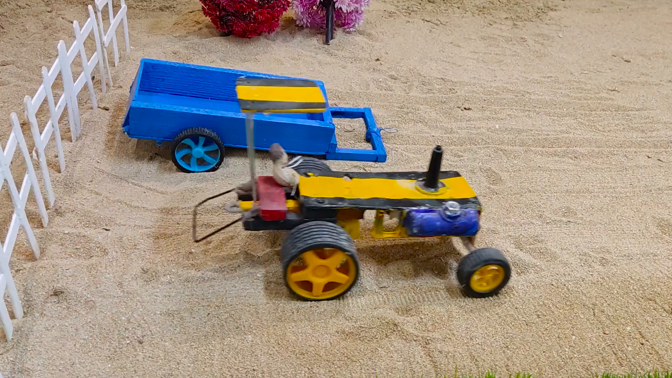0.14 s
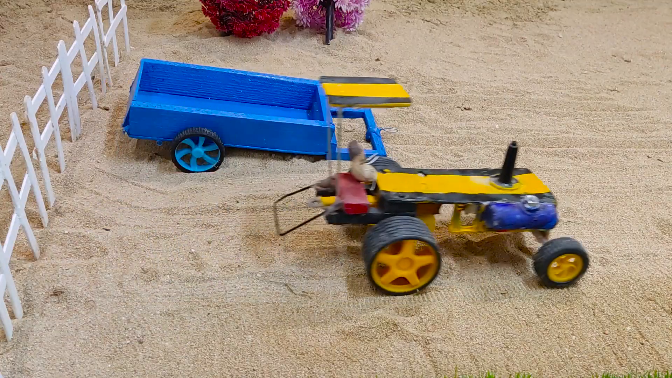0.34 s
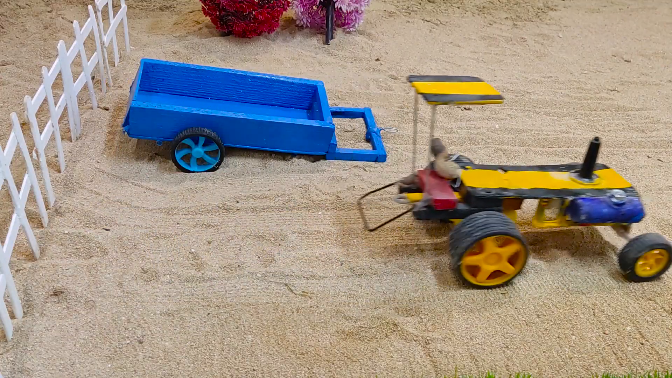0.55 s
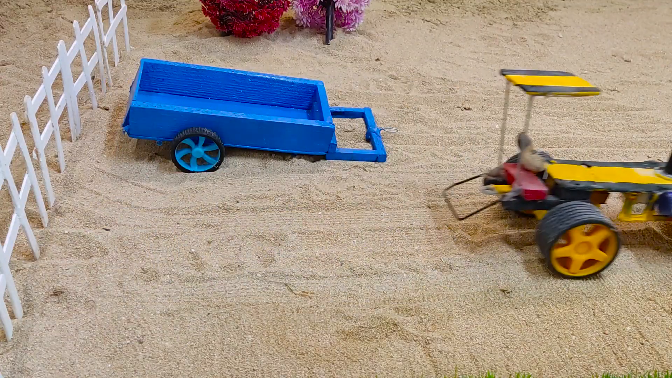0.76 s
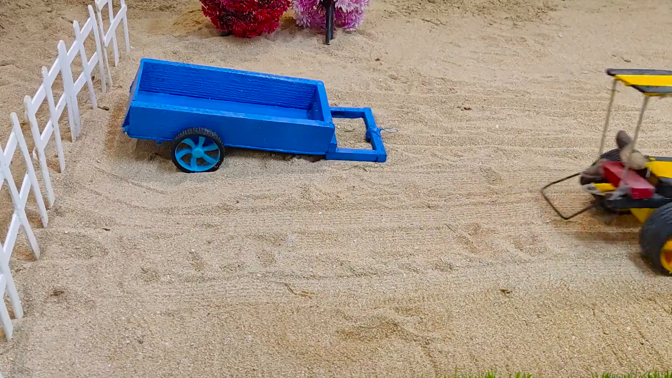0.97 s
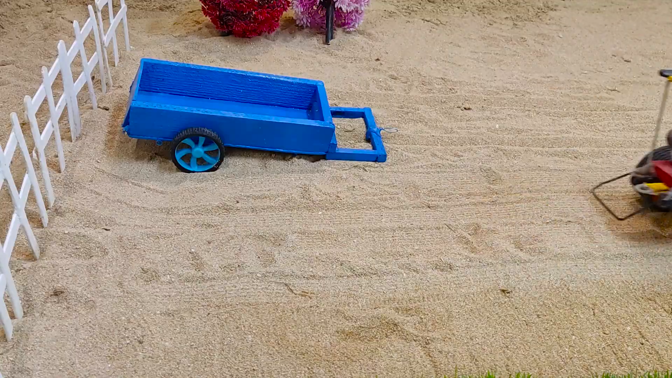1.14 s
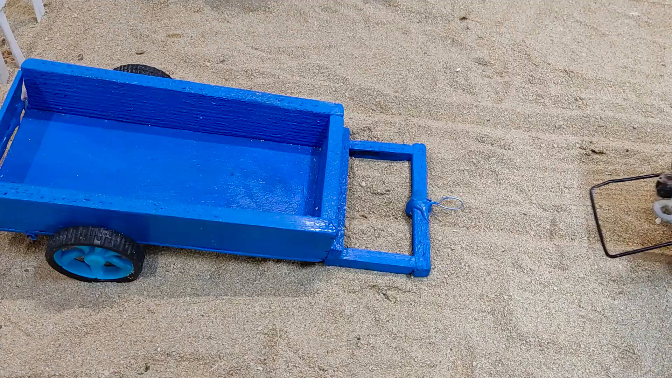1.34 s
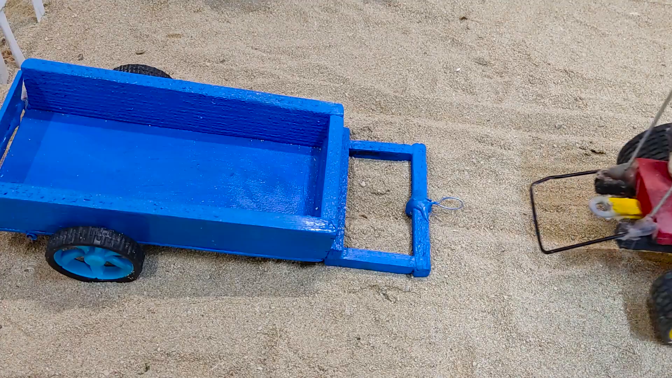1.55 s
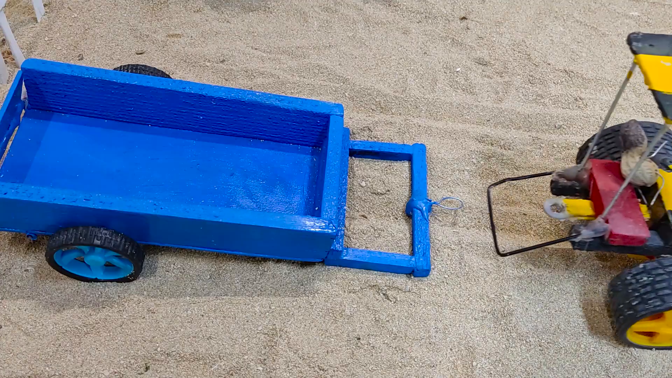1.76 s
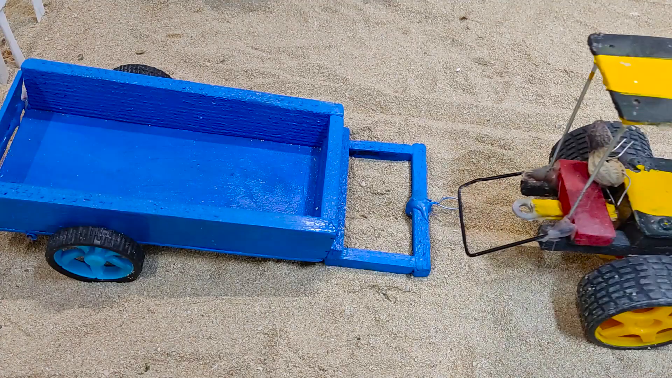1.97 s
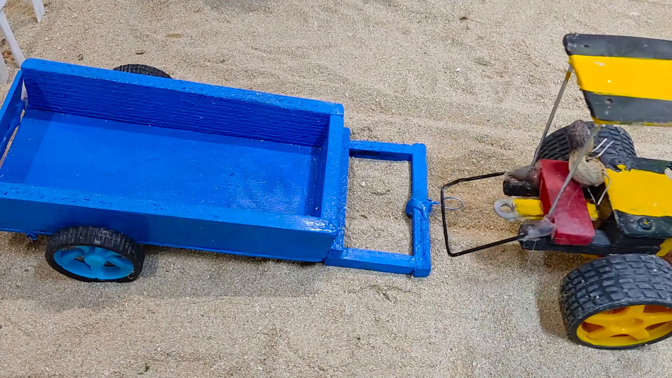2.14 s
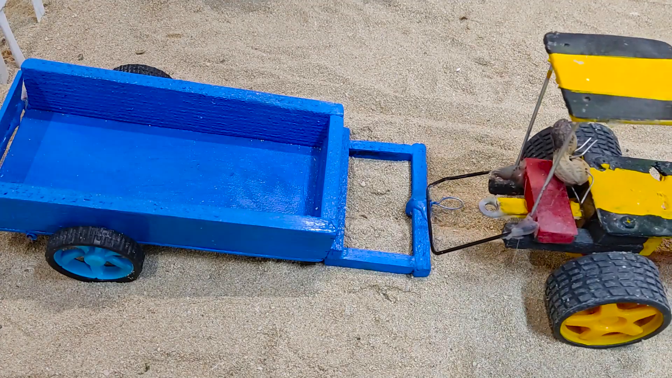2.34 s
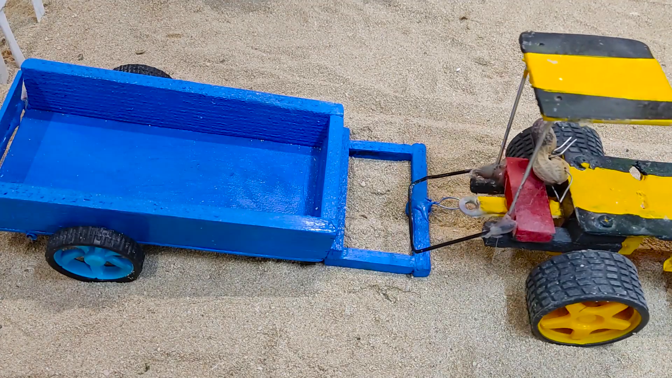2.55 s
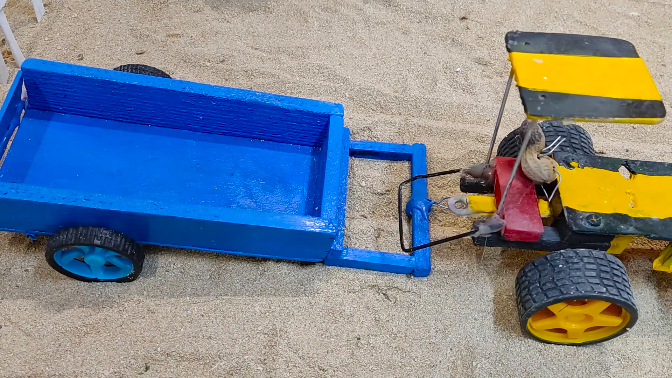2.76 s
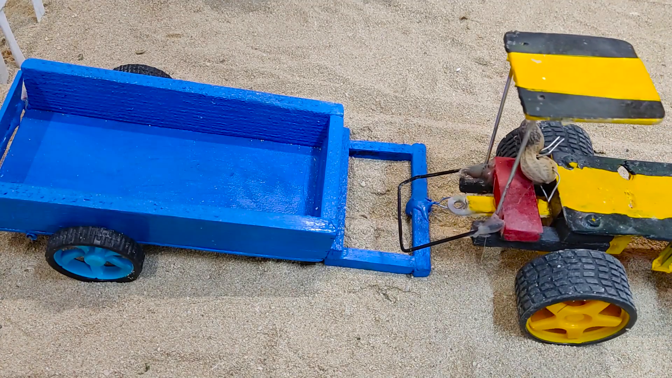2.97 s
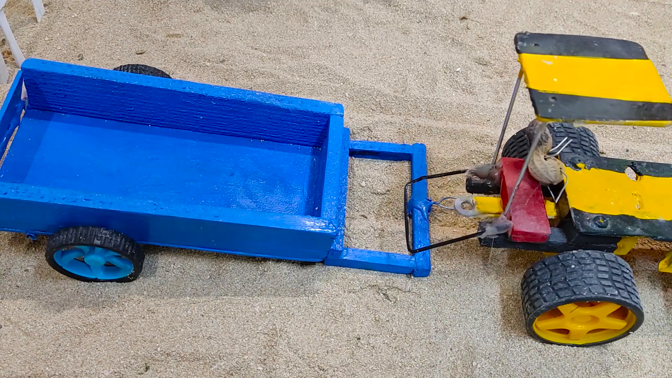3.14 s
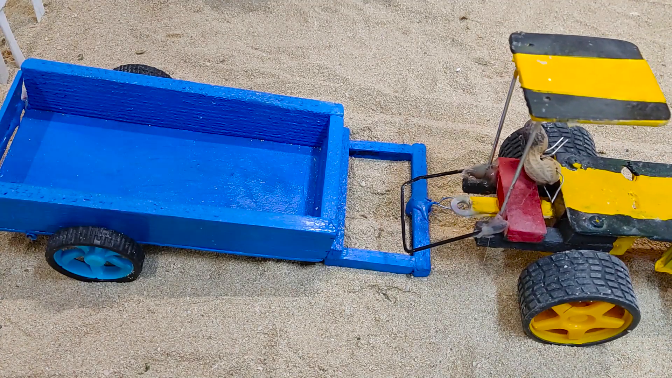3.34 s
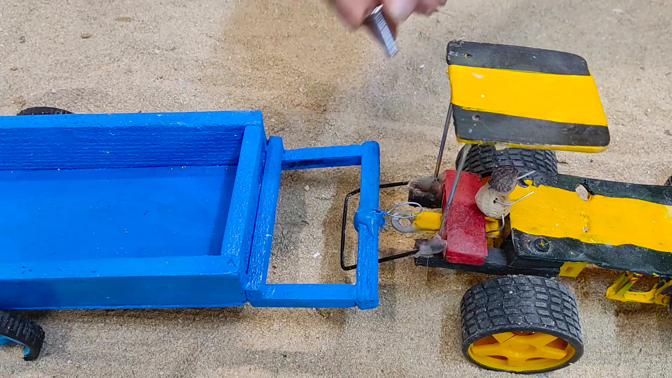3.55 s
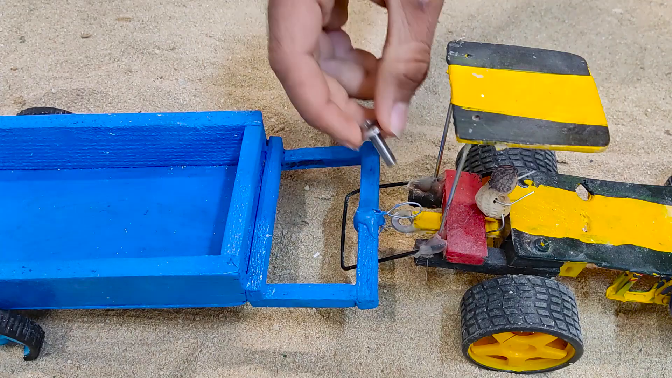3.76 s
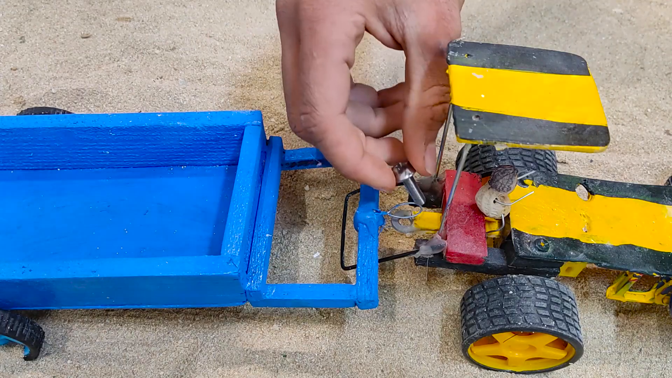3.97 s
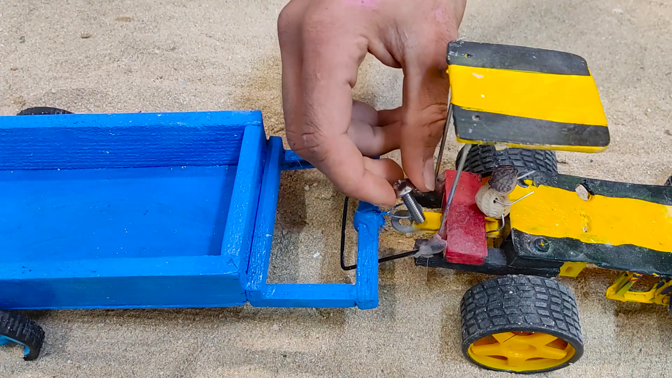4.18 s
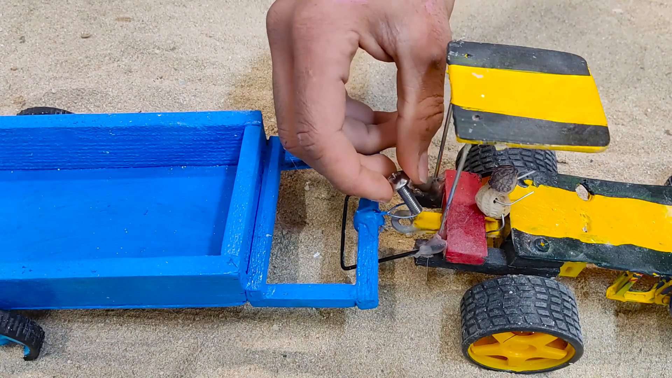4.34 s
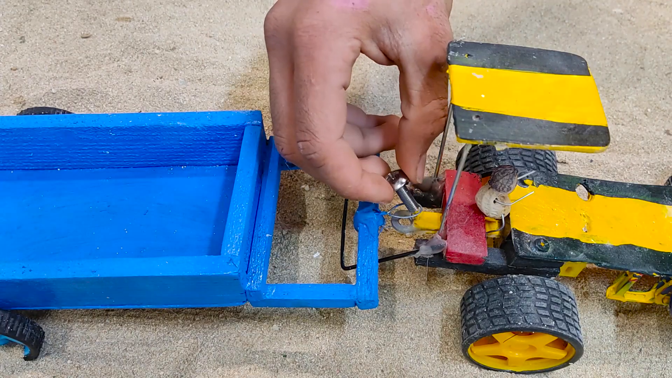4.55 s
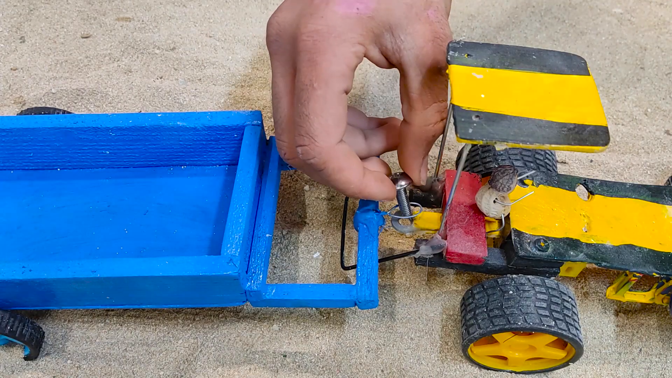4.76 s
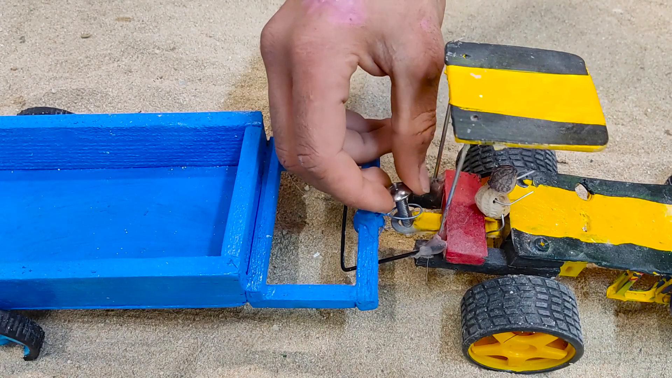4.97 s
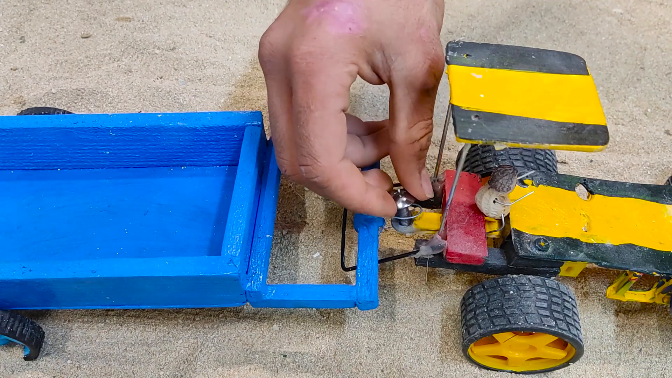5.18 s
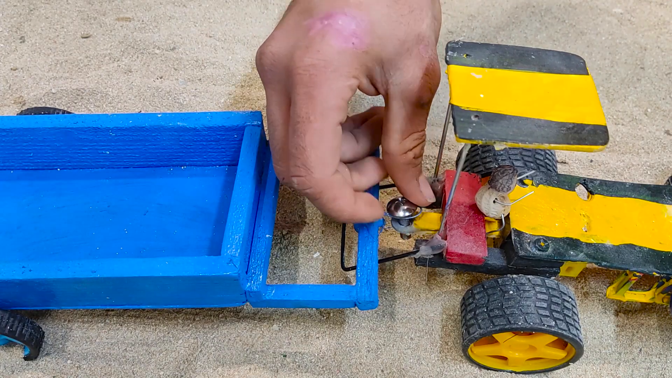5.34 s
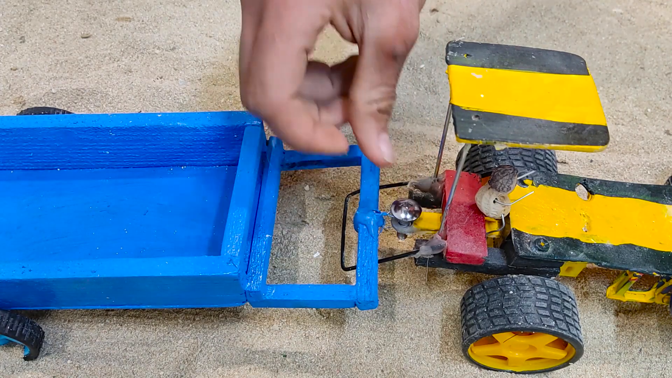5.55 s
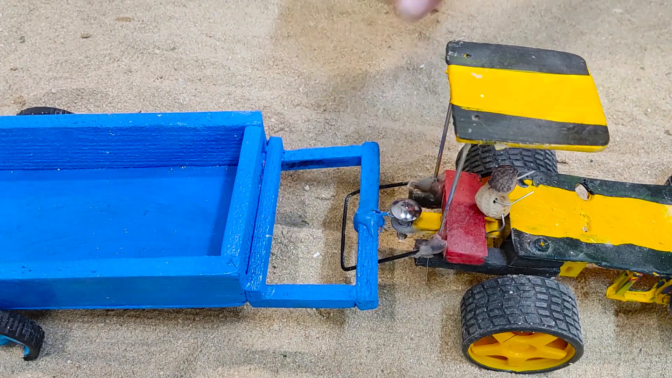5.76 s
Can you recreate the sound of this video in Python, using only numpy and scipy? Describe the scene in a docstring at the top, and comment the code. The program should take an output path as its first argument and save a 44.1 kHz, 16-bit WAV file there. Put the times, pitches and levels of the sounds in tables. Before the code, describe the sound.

Outdoor toy tractor scene in three abrupt cuts: first a centred, distant four-cylinder diesel running evenly, then a harder three-cylinder clatter close to the microphone with thin whine and wide rattle, then no engine nearby. Night crickets pulse over a far low rumble and thin hum, a clear trilling insect sits to the left, and a small metal part clicks sharply, knocks again louder and settles with soft thuds.

```python
"""Two diesels and a dropped pin

Three scenes with short silences between them: a four-cylinder diesel idles at a distance, a three-cylinder
one clatters close by, then a night field of crickets over a far rumble, where a steel pin drops into a
plastic hitch. Engines are noisy blows through resonances plus exhaust tones; crickets are falling tones,
far insects and rumble are filtered noise, and the pin is a crack with decaying tones."""
import sys
import numpy as np
from scipy import signal
from scipy.fft import rfft, irfft, next_fast_len
from scipy.io import wavfile
from scipy.ndimage import uniform_filter1d

SR = 44100
rng = np.random.default_rng(int(sys.argv[2]) if len(sys.argv) > 2 else 0)


def dump(signal):
    """Clip the signal to [-1, 1] and save it as 16-bit WAV at the path in sys.argv[1]."""
    limited = np.clip(np.atleast_2d(signal).T, -1, 1)
    pcm = np.round(limited * 32767).astype(np.int16)
    wavfile.write(sys.argv[1], SR, pcm)


N = 256220
TIME = np.arange(N) / SR  # seconds

# When each scene plays: start in seconds, end in seconds.
FAR_SPAN, NEAR_SPAN, NIGHT_SPAN = (-.1, 1.236), (1.258, 3.445), (3.471, 6.0)


def undb(db):
    """Turn decibels into a plain multiplier."""
    return 10 ** (np.asarray(db) / 20)


def level(x, db, span=None):
    """Set the rms level, measured over a span of time or over everything."""
    part = x[..., max(int(span[0] * SR), 0):int(span[1] * SR)] if span else x
    return x * undb(db) / np.sqrt(np.mean(part ** 2))


def noise():
    """White noise, equally strong at every pitch."""
    return rng.standard_normal(N)


def sine(hz, t, phase=0):
    """A pure tone."""
    return np.sin(2 * np.pi * hz * t + phase)


def bump(since_s, ms):
    """A smooth bell-shaped swell around time zero."""
    return np.exp(-.5 * (1000 * since_s / ms) ** 2)


def band(x, hz, width_hz):
    """A resonance with gain 1 at its centre."""
    return signal.lfilter(*signal.iirpeak(hz, hz / width_hz, fs=SR), x)


def steep(x, design):
    """Run a steep filter given as second-order sections."""
    return signal.sosfilt(design, x)


def bandpass(x, order, edges_hz):
    """Keep only what lies between two pitches."""
    return steep(x, signal.butter(order, edges_hz, "bandpass", fs=SR, output="sos"))


def decay(x, ms):
    """Every pulse becomes an exponential tail."""
    return signal.lfilter([1], [1, -np.exp(-1000 / (ms * SR + 500))], x)


def colour(x, points):
    """Shape a spectrum by points of Hz and dB."""
    hz, db = np.transpose(points)
    size = next_fast_len(N)
    log_hz = np.log(np.fft.rfftfreq(size, 1 / SR) + 1)
    return irfft(rfft(x, size) * undb(np.interp(log_hz, np.log(hz), db)), size)[:N]


def curve(table):
    """Draw straight lines between the rows of a table, one curve per column after the time."""
    s, *columns = np.transpose(table)
    return [np.interp(TIME, s, column) for column in columns]


def gate(start, end, fade=0.0011):
    """Open from start to end, with straight fades inside both ends; all in seconds."""
    return np.clip(np.minimum(TIME - start, end - TIME) / fade, 0, 1)


def walk(rate):
    """Slow random wander with spread 1, heading for a new value rate times a second."""
    hold = int(SR / rate)
    steps = np.repeat(rng.standard_normal(N // hold + 1), hold)
    x = uniform_filter1d(steps, hold)[:N]
    return x / x.std()


def left_right(song, pan_db, late_ms):
    """Place a sound by a level difference, left minus right, and by how late it reaches the left."""
    left = np.roll(song, int(late_ms * SR / 1000))
    return np.array([left * undb(pan_db / 2), song * undb(-pan_db / 2)])


def rattle(habit, round_s):
    """Noise of loose parts, whose lower part comes back nearly the same in each round of all cylinders."""
    share, memory, top_hz = habit
    fresh = np.sqrt(1 - memory ** 2)
    rounds = rng.standard_normal((int(N / SR / round_s) + 1, int(round(round_s * SR))))
    rounds[0] /= fresh  # so the first round is as strong as the rest
    same = signal.lfilter([fresh], [1, -memory], rounds, axis=0).ravel()
    same = np.sqrt(share) * np.resize(same, N) + np.sqrt(1 - share) * noise()
    size = next_fast_len(N)
    low = 1 / (1 + (np.fft.rfftfreq(size, 1 / SR) / top_hz) ** 12)
    mixed = rfft(same, size) * np.sqrt(low) + rfft(noise(), size) * np.sqrt(1 - low)
    return irfft(mixed, size)[:N]


def patchy(x, flicker_db):
    """Each narrow treble band swells and fades on its own, so the hiss turns gritty."""
    centres_hz = 3700 * 1.09 ** np.arange(14)
    return x + sum((undb(flicker_db * walk(40)) - 1) * band(x, hz, hz / 14) for hz in centres_hz)


def body(x, peaks):
    """Side-by-side resonances of the engine, added with alternating sign."""
    return sum((-1) ** k * undb(db) * band(x, hz, width) for k, (hz, width, db) in enumerate(peaks))


def exhaust_thump(tones, cycle, silencer):
    """Tones at multiples of the firing rate, each wandering in level; the silencer turns their phase."""
    return sum(undb(db + walk(9)) * np.cos(2 * np.pi * k * cycle - 2 * np.arctan(2.5 * (k - silencer)))
               for k, db in tones)


def panel_booms(booms, t, round_s):
    """Panels ring briefly once in each round of all cylinders: bell-shaped bursts of tone."""
    out = 0
    for at_ms, hz, db, ms in booms:
        since = (t - at_ms / 1000 + round_s / 2) % round_s - round_s / 2
        out = out + undb(db + 1.04 * walk(6.97)) * bump(since, ms) * sine(hz, since)
    return out


def diesel(span, firing, cylinders, blow, block, knock, hiss, exhaust, pipe, booms, mix, habit):
    """Firings in cylinder order: a blow and its rebound ring block and chamber, the exhaust thumps later."""
    first_s, rate = firing
    rise_ms, decay_ms, rebound_ms, tail_ms, tail_db, scatter_db, strike_db = blow
    *layer_dbs, hiss_tilt, flicker_db = mix
    thump_late_ms, silencer = pipe
    count = int((span[1] - first_s) * rate) + 1
    round_s = len(cylinders) / rate
    rows = np.array(cylinders)[np.arange(count) % len(cylinders)]
    chance = rng.standard_normal((count, 6))
    late_s = (rows[:, 0] + 0.026 * chance[:, 0]) / 1000
    at = ((first_s + np.arange(count) / rate + late_s) * SR).astype(int)

    def blows(column, strike):
        """A clean strike, then loose parts rattle."""
        hits = np.zeros(N)
        size = undb(rows[:, column] + scatter_db * chance[:, column])
        hits[at] = size
        tail = undb(tail_db) * decay(hits, tail_ms)  # only the first blow has this long tail
        rebound = undb(rows[:, 4] + scatter_db * chance[:, 4])
        hits[at + int(rebound_ms * SR / 1000)] = size * rebound
        swell = decay(decay(hits, decay_ms) + tail, rise_ms)
        return strike * hits + level(swell, -14.0, span) * rattle(habit, round_s)

    t = TIME - first_s
    cycle = (t - thump_late_ms / 1000) * rate
    cylinder_db = np.interp(cycle, np.arange(count), rows[:, 5])
    puff = [(hz, db - hiss_tilt * np.log2(max(hz / 5000, 1))) for hz, db in hiss]
    layers = (
        body(blows(column=1, strike=undb(strike_db)), block),
        body(blows(column=2, strike=undb(strike_db)), knock),
        colour(blows(column=3, strike=0), puff),
        colour(rattle(habit, round_s) * undb(1.38 * walk(160)), hiss),
        exhaust_thump(exhaust, cycle, silencer) * undb(cylinder_db))
    engine = sum(level(x, db, span) for x, db in zip(layers, layer_dbs))
    return patchy(engine, flicker_db) + panel_booms(booms, t, round_s)


# First firing in seconds, firings per second.
FAR_FIRING = (.001, 24.435)
# The cylinders in firing order. Each row: lateness in ms, then block, knock, hiss, rebound and exhaust in dB.
FAR_CYLINDERS = [(-0.9, -1, 1, -1.5, -5, -2), (-3, -1.5, -3.5, -2, -11, -4.5),
                 (-2.5, -6.5, -5, -6, 3.5, -2), (-3, -8, -3.5, -7, 2, -1)]
# One blow: rise in ms, decay in ms, rebound after ms, tail in ms, tail in dB, scatter in dB, strike in dB.
FAR_BLOW = (1.5, 9.5, 5, 18, -6, 0.6, 0.5)
# Rattle: share that repeats (0-1), memory from round to round (0-1), repeats up to this many Hz.
FAR_HABIT = (.75, .7, 2600)
# Resonances of the engine block. Each row: pitch in Hz, width in Hz, gain in dB.
FAR_BLOCK = [(317, 15.2, -7.5), (349.5, 14, -7.5), (477.6, 6.4, -3), (673, 9.3, -8), (880, 52, -11),
             (974, 29.5, -4.5), (1097, 85, -8.5), (1140, 43, -6.5), (1310, 54, -32), (1411.6, 35.7, -2),
             (1420, 90, -16)]
# Resonances of the combustion knock. Each row: pitch in Hz, width in Hz, gain in dB.
FAR_KNOCK = [(2025, 63, 1.5), (2215, 170, -2), (2400, 54, 2), (2860, 270, -17), (3480, 290, -9)]
# Tone colour of gas hiss and running noise. Each row: pitch in Hz, relative strength in dB per Hz.
FAR_HISS = [(53, -28.5), (90, -7), (117, -7.5), (219, -8), (310, -3.5), (581, -3.5), (1140, 0), (2430, -9),
            (3830, -21.5), (4450, -26), (6030, -29.5), (14700, -58.5), (16000, -63)]
# Exhaust tones. Each row: multiple of the firing rate, relative level in dB.
FAR_EXHAUST = [(2, -1.5), (3, 3), (4, -37.5), (5, -32), (6, -6), (7, -13.5), (8, -34), (10, -10.5),
               (13, -6)]
# Exhaust pipe: thump lateness in ms, silencer resonance as a multiple of the firing rate.
FAR_PIPE = (12.4, 9)
# Ringing panels. Each row: time within the round in ms, pitch in Hz, level in dB, length in ms.
FAR_BOOMS = [(6.05, 1109, -24.5, 8.3), (18.2, 1150, -30, 5), (46, 970, -31.5, 2.3), (46.07, 367, -34, 5.3),
             (54, 1094, -29, 6.7), (69.3, 372, -33, 8.5), (85.57, 887, -49, 3.5), (88.6, 385, -35, 4.2),
             (95, 1200, -28, 2.9), (101.7, 1300, -37, 5.4), (132.5, 338, -28, 5.2), (135.5, 1143, -33, 4.6),
             (139.9, 322, -29.5, 9.7)]
# Levels in dB: block, knock, pulsed hiss, steady noise, exhaust; then how much the pulsed hiss is dulled
# above 5 kHz in dB per octave (below zero brightens it), and treble flicker in dB.
FAR_MIX = (-35, -41, -31.5, -31.5, -35.5, -2, 2)


def far_diesel():
    """Four cylinders at a distance, the same on both sides; soft, slowly rising blows."""
    return diesel(FAR_SPAN, FAR_FIRING, FAR_CYLINDERS, FAR_BLOW, FAR_BLOCK, FAR_KNOCK, FAR_HISS,
                  FAR_EXHAUST, FAR_PIPE, FAR_BOOMS, FAR_MIX, FAR_HABIT)


# Thin squeaks from the far machine. Each row: centre in seconds, length in seconds, pitch in Hz,
# level in dB before the final doubling.
SQUEAKS = [(.148, .02, 14300, -72), (.195, .04, 14700, -66), (.212, .015, 8950, -62),
           (.232, .025, 14500, -71), (0.25, .03, 9000, -62), (.278, 0.031, 8900, -59),
           (.312, .02, 14600, -69), (.35, .025, 10850, -68), (.4, .04, 10800, -64), (.432, .02, 14550, -69),
           (.468, .015, 14500, -71), (.518, .03, 14650, -66), (0.683, .02, 10800, -71),
           (.728, .025, 10750, -68), (.845, 0.027, 10850, -68), (.93, .025, 10650, -73),
           (1.05, .02, 10900, -71), (1.165, .025, 14650, -69)]


def squeaks():
    """Short wavering whistles: bell-shaped bursts of tone that share one unsteady phase."""
    waver = 1.5 * walk(200)
    return 2 * sum(undb(db) * bump(TIME - s, 1000 * length / 2.5) * sine(hz, TIME, waver)
                   for s, length, hz, db in SQUEAKS)


# The near engine's settings have the same columns as the far engine's.
# First firing in seconds, firings per second.
NEAR_FIRING = (1.2602, 22.325)
# The cylinders in firing order. Each row: lateness in ms, then block, knock, hiss, rebound and exhaust in dB.
NEAR_CYLINDERS = [(0.324, -2, 3.5, 2, -17, -1.3), (0.78, -6.5, -10.5, -2.5, 2, -0.0055),
                  (-0.525, 1, 5, 2, -17, -1.6)]
# One blow: rise in ms, decay in ms, rebound after ms, tail in ms, tail in dB, scatter in dB, strike in dB.
NEAR_BLOW = (0.4, 4.5, 6, 16, -4, 1.5, 20.5)
# Rattle: share that repeats (0-1), memory from round to round (0-1), repeats up to this many Hz.
NEAR_HABIT = (.85, .99, 3500)
# Resonances of the engine block. Each row: pitch in Hz, width in Hz, gain in dB.
NEAR_BLOCK = [(293, 5.8, -15), (565, 12, -5), (623, 49, -9), (783, 18, -13), (849, 11, -8), (955, 210, -3),
              (1055, 74, 2.5), (1224, 51, 3), (1300, 126, 2), (1415, 60, 2.5), (1574, 24, 1.5)]
# Resonances of the combustion knock. Each row: pitch in Hz, width in Hz, gain in dB.
NEAR_KNOCK = [(2060, 400, -15), (2410, 197, -2), (2625, 263, -1.5), (2770, 202, 3.5), (2943, 244, 3),
              (3128, 251, -1.5)]
# Tone colour of gas hiss and running noise. Each row: pitch in Hz, relative strength in dB per Hz.
NEAR_HISS = [(18, -43.5), (30, -17), (98, -7.5), (199, -4), (355, -8), (780, -0.5), (1160, -6), (1500, -2),
             (2120, -11.5), (2900, -12), (3580, -17), (5450, -24.5), (10800, -23), (14000, -37),
             (16000, -56)]
# Exhaust tones. Each row: multiple of the firing rate, relative level in dB.
NEAR_EXHAUST = [(3, -26), (4, 1), (5, -1), (6, 0), (7, -2.5), (8, 2), (9, -5.5), (10, -0.5), (11, -20),
                (19, -8)]
# Exhaust pipe: thump lateness in ms, silencer resonance as a multiple of the firing rate.
NEAR_PIPE = (28.5, 7.35)
# Ringing panels. Each row: time within the round in ms, pitch in Hz, level in dB, length in ms.
NEAR_BOOMS = [(58.66, 189, -23.5, 11.8), (127, 577.3, -25.5, 8.1), (86.07, 267, -26, 5.4),
              (3.07, 995, -13.5, 1.7), (6.83, 787, -17, 2.8), (9.01, 1533, -16.5, 2.8),
              (7.556, 2670, -20.5, 1.55), (22.22, 840, -25.5, 4.6), (48, 830, -22, 1.33),
              (59.2, 738, -25.5, 4.9), (76, 720, -26, 2.84), (93.16, 2980, -18.5, 1.7),
              (92.5, 975, -22, 1.4), (93.6, 1390, -20.5, 2.2), (96, 780, -23.5, 4.8),
              (99.5, 2300, -22.5, 3.4), (103.5, 1270, -20.5, 2.2), (107, 624, -27, 4.3),
              (110, 2820, -23.5, 2)]
# Levels in dB: block, knock, pulsed hiss, steady noise, exhaust; then dulling of the pulsed hiss above
# 5 kHz in dB per octave (below zero brightens it), and treble flicker in dB.
NEAR_MIX = (-29.5, -26, -27, -25.5, -27, -0.8, 2.5)
# Thin whines of belts or pumps. Each row: pitch in Hz, level in dB.
NEAR_WHINES = [(12575, -57), (13609, -59)]
# Slow changes of loudness. Each row: time in seconds, overall gain, knock band gain and bass gain in dB.
NEAR_LOUDNESS = [(1.26, -0.5, -0.5, -3), (2.2, -0.4, 1.05, -1.1), (3.44, 0.5, -2, -0.3)]
# How far the sound spreads sideways. Each row: pitch in Hz, gain of the left-right difference in dB.
NEAR_WIDTH = [(60, -36.5), (130, -62), (300, -30.5), (500, -21.5), (800, -14), (1400, -19.5), (2800, -10),
              (5000, -1), (6800, 1), (9200, -18), (12000, -2), (15000, 1)]
# Share of the clatter that leans left, and how much earlier it arrives there.
NEAR_LEFT, NEAR_LEFT_EARLY_MS = .11, .02


def near_diesel():
    """Close by, rattle and hiss come from all over the machine, unlike left and right; belts or pumps whine."""
    def engine(blow, booms):
        return diesel(NEAR_SPAN, NEAR_FIRING, NEAR_CYLINDERS, blow, NEAR_BLOCK, NEAR_KNOCK, NEAR_HISS,
                      NEAR_EXHAUST, NEAR_PIPE, booms, NEAR_MIX, NEAR_HABIT)

    mid = engine(NEAR_BLOW, NEAR_BOOMS)
    spread = engine(NEAR_BLOW[:-1] + (-20,), [])  # hardly any clean strike, no panels
    mid = mid + sum(undb(db + 3 * walk(12)) * sine(hz, TIME, .5 * walk(43)) for hz, db in NEAR_WHINES)
    loud_db, knock_db, bass_db = curve(NEAR_LOUDNESS)
    knock_change = (undb(knock_db) - 1) * band(mid, 2800, 1300)
    bass_change = (undb(bass_db) - 1) * band(mid, 180, 140)
    mid = mid + knock_change + bass_change
    # adding some slope to one side and taking it from the other shifts their arrival times apart
    lean = NEAR_LEFT * mid + NEAR_LEFT_EARLY_MS * SR / 2000 * np.gradient(mid)
    side = colour(spread, NEAR_WIDTH) + band(band(lean, 2000, 5000), 2600, 7000)
    return np.array([mid + side, mid - side]) * undb(loud_db)


# Sounding part of each stroke; how far down the fall the wing resonates, and how widely.
STROKE_SHARE, WING_SHARE, WING_WIDTH_HZ = .8, 0.31, 650


def wing(rate, top_hz, fall_hz, pan_db, late_ms):
    """Each wing stroke is a tone falling in pitch, loudest near the wing's resonance; a short rest follows."""
    pace = rate * (1 + .025 * walk(6) + .07 * walk(35))
    stroke = (np.cumsum(pace) / SR + rng.random()) % 1
    stroke = np.minimum(stroke / STROKE_SHARE, 1)
    pitch_hz = top_hz - fall_hz * stroke + 60 * walk(23)
    tone = np.sin(2 * np.pi * np.cumsum(pitch_hz) / SR)
    strength = undb(2.0 * walk(11.0) + 2.9 * walk(300)) * np.sin(np.pi * stroke)
    song = band(strength * tone, top_hz - WING_SHARE * fall_hz, WING_WIDTH_HZ)
    return left_right(song, pan_db, late_ms)


# Chirps, about four a second. Each row: end in seconds, level in dB when fully swelled.
CHIRPS = [(3.612, -35), (3.848, -33.5), (4.100, -34.5), (4.358, -32.5), (4.605, -32.5), (4.848, -33),
          (5.100, -33), (5.345, -32), (5.585, -32), (5.835, -33)]
# Chirp length, the swell at its start, the slow sag after it, the quick end.
CHIRP_S, SWELL_S, SWELL_DB, SAG_DB_PER_S, RELEASE_S = 0.23, 0.14, 9, 31, 0.018
# Chirping crickets. Each row: pulses per second, top pitch in Hz, fall in Hz, relative level in dB,
# left minus right in dB, lateness on the left in ms.
SINGERS = [(45.7, 3880, 880, 1, 2, .03), (47.8, 3880, 960, 4, -1.5, -.03), (44.1, 4150, 430, -8, 4, .05),
           (46.43, 4350, 710, -2.5, -10.5, .12), (46.8, 4100, 1000, -4, -1, -.06),
           (44.6, 4000, 710, -8, 0, 0.084)]
# Trilling crickets. Each row: pulses per second, top pitch in Hz, fall in Hz, left minus right in dB,
# lateness on the left in ms.
TRILLERS = [(44, 4200, 900, 0.92, 0), (47.1, 4050, 800, -1, .05), (45.1, 3900, 800, .5, -.05)]
# Loudness of the trill. Each row: time in seconds, level in dB.
TRILLER_LEVEL = [(3.47, -67), (3.6, -37), (3.8, -43), (3.95, -42.5), (5.1, -55), (5.22, -36), (5.5, -36),
                 (5.81, -36.5)]
LEAVES_DB = -36  # gain of the echo of the foliage
CRICKET_BAND_HZ = (2950, 4400)


def crickets():
    """Singers chirp in step, each chirp swelling and stopping short, over an unbroken trill; leaves smear them."""
    chirps = 0
    for end, db in CHIRPS:
        since = TIME - end + CHIRP_S
        swell_db = SWELL_DB * np.clip(1 - since / SWELL_S, 0, 1)
        sag_db = SAG_DB_PER_S * np.clip(since - SWELL_S, 0, 1)
        opening = gate(end - CHIRP_S, end + RELEASE_S / 2, RELEASE_S)
        chirps = chirps + undb(db - swell_db - sag_db) * opening
    choir = sum(undb(db) * wing(rate, top_hz, fall_hz, pan_db, late_ms)
                for rate, top_hz, fall_hz, db, pan_db, late_ms in SINGERS)
    trill = level(sum(wing(*row) for row in TRILLERS), 0) * undb(curve(TRILLER_LEVEL)[0])
    out = level(choir, 0) * chirps + trill
    leaves = rng.standard_normal((2, 4000)) * np.exp(-np.arange(4000) / 960.0)
    out = out + undb(LEAVES_DB) * signal.fftconvolve(out, leaves, axes=1)[:, :N]
    return bandpass(out, 5, CRICKET_BAND_HZ)


# Distant insects. Each row: pitch in Hz, width in Hz, level in dB before a cut from 8.2 to 10.3 kHz,
# throbs per second, throb depth (0-1), left minus right in dB.
INSECTS = [(5880, 850, -38, 120, 0.12, -4.5), (7250, 720, -43, 19, 0.5, 11),
           (7890, 290, -47.5, 20, 0.35, 14), (11720, 2220, -65, 40, 0.1, 10.5),
           (3660, 810, -41.5, 200, 0.28, -4.5)]


def insects():
    """Far choirs blur into throbbing bands of noise, unlike left and right."""
    out = 0
    for hz, width_hz, db, rate, depth, pan_db in INSECTS:
        edges_hz = (hz - width_hz / 2, hz + width_hz / 2)
        hiss = np.array([bandpass(noise(), 3, edges_hz) for _ in range(2)])
        throb = 1 + depth * sine(rate, TIME, walk(2.43))
        sides = undb([[pan_db / 2], [-pan_db / 2]])
        out = out + level(hiss * sides * throb * undb(1.6 * walk(4.115)), db)
    return steep(out, signal.ellip(6, .5, 60, (8200, 10300), "bandstop", fs=SR, output="sos"))


# Tone colour of the rumble. Each row: pitch in Hz, relative strength in dB per Hz.
RUMBLE = [(12, -65), (20, -27), (45, -15), (63, 3), (80, -11), (130, -7.5), (200, -13.5), (400, -22),
          (950, -27), (1400, -32), (2400, -39), (2700, -54), (5000, -110)]
# Loudness of the rumble. Each row: time in seconds, level in dB.
RUMBLE_LEVEL = [(3.47, -43), (4.95, -44.5), (5.5, -40)]
RUMBLE_RIGHT = 0.077  # share of the rumble that leans right
# Thin hum: start in seconds, end in seconds, pitch in Hz, level in dB.
HUM = (3.47, 5.15, 359, -53)


def rumble():
    """Far traffic or machines: low noise, nearly alike on both sides, and a thin hum."""
    mid, side = colour(noise(), RUMBLE), colour(noise(), RUMBLE)
    side = 0.138 * side + .5 * band(side, 2050, 2000) - RUMBLE_RIGHT * mid
    loudness = undb(curve(RUMBLE_LEVEL)[0] + 0.46 * walk(3.2))
    both = (mid + side * [[1], [-1]]) / mid.std() * loudness
    start, end, hz, db = HUM
    return both + gate(start, end, .08) * level(sine(hz, TIME, .3 * walk(4)), db)


# Lone trillers. Each row: start in seconds, end in seconds, pitch in Hz, pulses per second,
# level in dB before the fades and the lean to the left.
TRILLS = [(4.38, 5.2, 7040, 24.8, -47), (5.15, 6, 7280, 49.6, -44), (4.55, 4.98, 14115, 24.8, -71)]
TRILL_LEFT_DB, TRILL_LEFT_LATE_MS = 8, .046  # they sit on the left


def lone_trillers():
    """Near trillers stay clear: a tone with unsteady phase, chopped into regular pulses."""
    out = 0
    for start, end, hz, rate, db in TRILLS:
        pulses = np.clip(sine(rate, TIME - start), 0, 1) ** 1.1
        song = level(pulses * sine(hz, TIME, 1.5 * walk(90)), db) * gate(start, end, .1)
        out = out + left_right(song, TRILL_LEFT_DB, TRILL_LEFT_LATE_MS)
    return out


def ring(modes, ms, t):
    """One blow on a set of decaying tones; a contact of some ms softens the start."""
    tones = sum(undb(db - 60 * t / t60) * sine(hz, t) for hz, db, t60 in modes)
    return (1 - np.exp(-1000 * t / ms)) * tones


# Pin drop and bounces. Each row: time in seconds, overall gain in dB, then crack, knock, pin ring,
# plate ring and thud in dB, softness in ms.
PIN = [(5.219, -41, 4, -12, -2, -1.5, -16, .01), (5.3306, -1, -2, -6, 3, 2, -15, 0.0074),
       (5.3362, -11.5, -6, -7, -6, -8, -5, 0.023), (5.435, -10.5, -2.5, -4.5, -0.5, -5, -8, 0.032),
       (5.47, -21, -10, -5, -17.5, -19.5, -10, 0.13)]
# Tones of the steel pin. Each row: pitch in Hz, level in dB, time to fall by 60 dB in seconds.
PIN_MODES = [(1868, -29.5, 0.21), (2430, -24, 0.09), (2646, -14, 0.089), (2680, -26, 0.07),
             (4430, -15, 0.05), (4696, -14, 0.045), (4930, -4, 0.053), (6216, -7, 0.035),
             (7450, -7.5, 0.02), (9100, -23, 0.054)]
# Tones of the plate. Each row: pitch in Hz, level in dB, time to fall by 60 dB in seconds.
PLATE_MODES = [(727, -15.5, 0.088), (1490, -24.5, 0.094), (3700, -15, 0.1)]
# Tones of the hitch. Each row: pitch in Hz, level in dB, time to fall by 60 dB in seconds.
HITCH_MODES = [(67, -24, 0.2), (107, 7.5, 0.047), (128, -3.5, 0.076), (204, 0, 0.024), (274, -4, 0.034),
               (400, 0, 0.017), (493, -8, 0.0191)]
# The knock spreads through the plastic treble first: its pitch is KNOCK_CYCLES / (start + time).
KNOCK_CYCLES, KNOCK_START_MS, KNOCK_DECAY_MS = 1.593, 0.309, 9.6


def pin():
    """A crack, a knock falling in pitch, the ring of steel and plastic, a low thud; soft bounces are duller."""
    out, t = np.zeros(N + SR), np.arange(int(SR / 2)) / SR
    # each hitch tone builds up over about one cycle, so the lows come late
    thud = sum(ring([mode], 1000 / mode[0], t) for mode in HITCH_MODES)
    knock_cycle = KNOCK_CYCLES * np.log(1 + 1000 * t / KNOCK_START_MS)
    knock = np.exp(-1000 * t / KNOCK_DECAY_MS) * np.sin(2 * np.pi * knock_cycle)
    pin_ring, plate_ring = ring(PIN_MODES, 2.7, t), ring(PLATE_MODES, 3.2, t)
    for s, db, crack_db, knock_db, ring_db, plate_db, thud_db, soft_ms in PIN:
        grit = rng.standard_normal(len(t))
        crack = band(grit * np.exp(-t / 0.003), 1600, 2800)
        crack = crack + 0.26 * band(grit * np.exp(-t / 0.0012), 7300, 5000)
        sharp = undb(crack_db) * crack + undb(knock_db) * knock
        sharp = sharp + undb(ring_db) * pin_ring + undb(plate_db) * plate_ring
        # two short smears dull the blow; the division keeps its low tones about as strong
        sharp = decay(decay(sharp, soft_ms), soft_ms) / (soft_ms * SR / 1000 + 1) ** 2
        hit = undb(db) * (sharp + undb(thud_db) * thud)
        out[int(s * SR):int(s * SR) + len(hit)] += hit
    return out[:N]


# The trailer rocks on the sand. Each row: centre in seconds, pitch in Hz, level in dB, length in ms.
ROCKS = [(5.352, 85, -14, 7.1), (5.39, 70, -24.5, 8.6), (5.425, 65, -28, 9), (5.452, 75, -22, 7),
         (5.495, 75, -29, 11), (5.53, 60, -26, 14)]


def rocking():
    """Soft low swells as the trailer rocks: bell-shaped bursts of a deep tone."""
    return sum(undb(db) * bump(TIME - s, ms) * sine(hz, TIME - s) for s, hz, db, ms in ROCKS)


def scene():
    """The far engine, the near engine and the night, one after another."""
    far = far_diesel() + squeaks()
    night = crickets() + insects() + rumble() + lone_trillers() + pin() + rocking()
    return far * gate(*FAR_SPAN) + near_diesel() * gate(*NEAR_SPAN) + night * gate(*NIGHT_SPAN, 0.0102)


TOP_HZ = 15700


def record(dry):
    """Round the loudest peaks softly and cut everything above TOP_HZ."""
    rounded = np.tanh(dry / .95) * .95
    return steep(rounded, signal.ellip(8, .2, 70, TOP_HZ, fs=SR, output="sos"))


dry = scene()
out = record(dry)
dump(out)
```